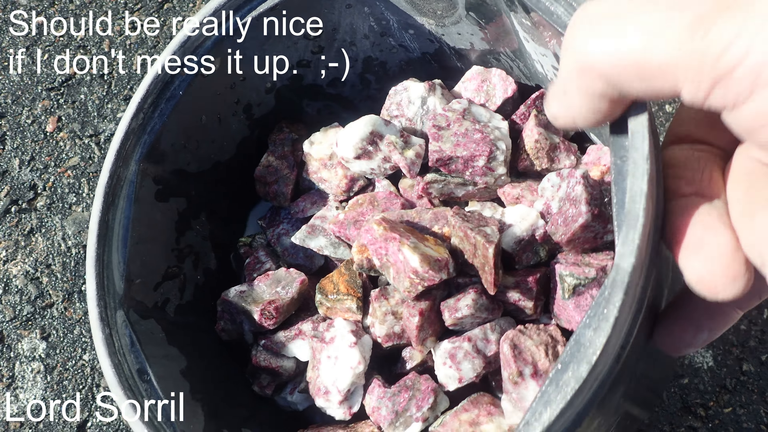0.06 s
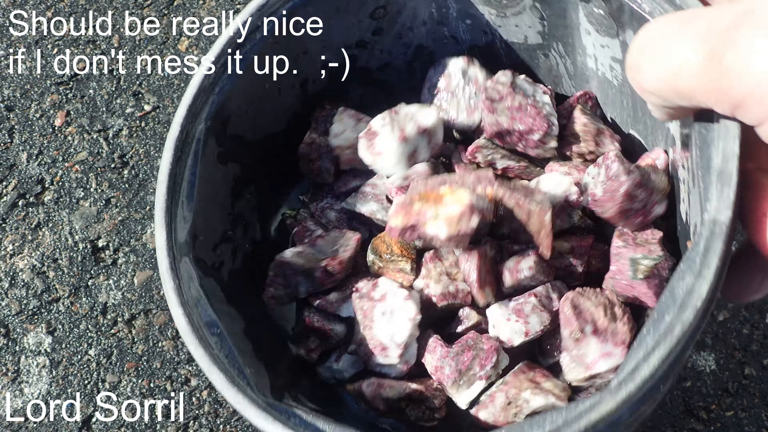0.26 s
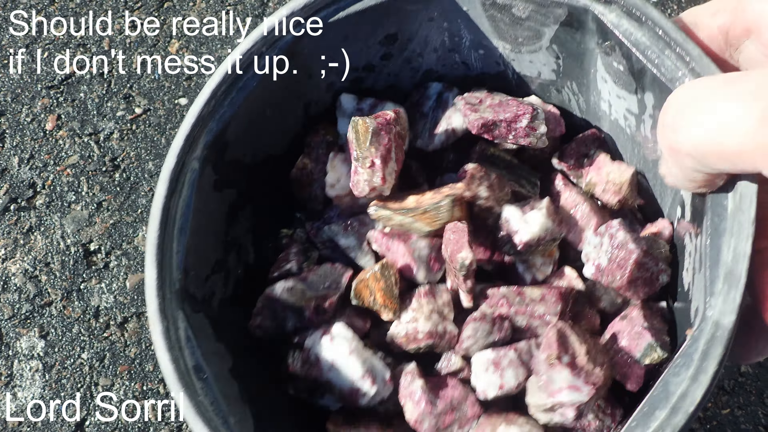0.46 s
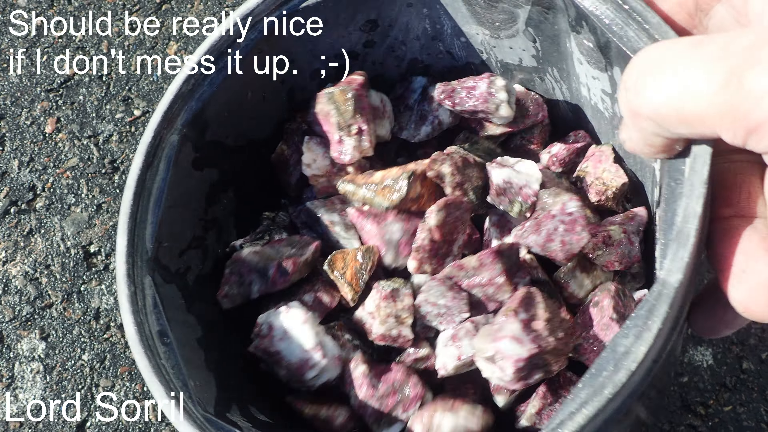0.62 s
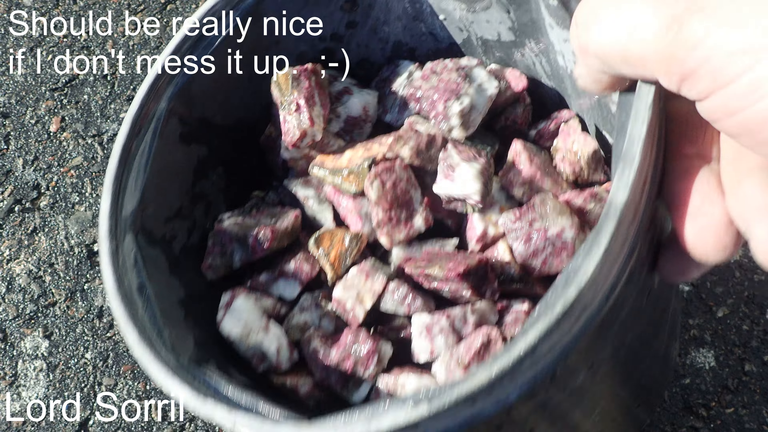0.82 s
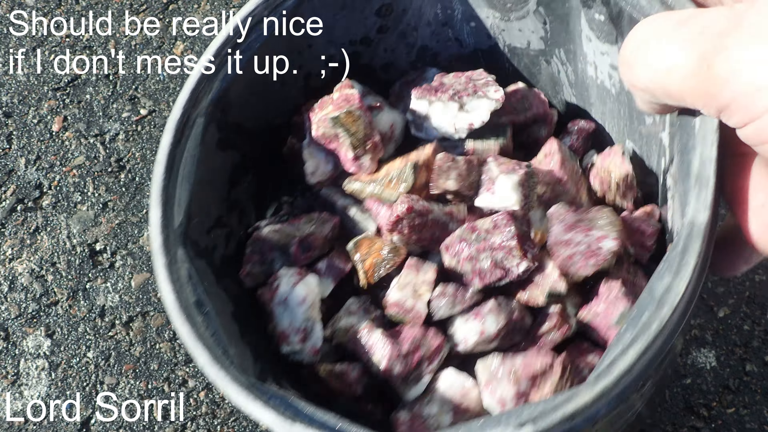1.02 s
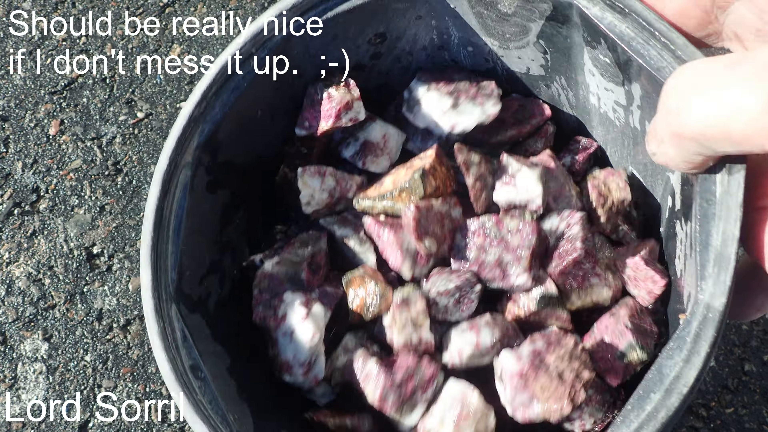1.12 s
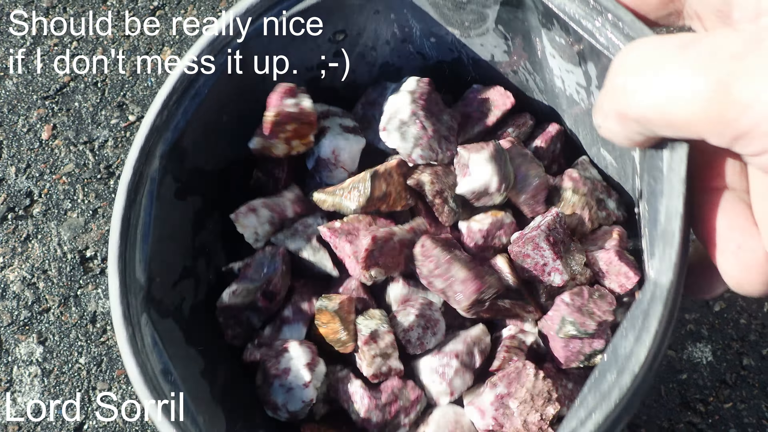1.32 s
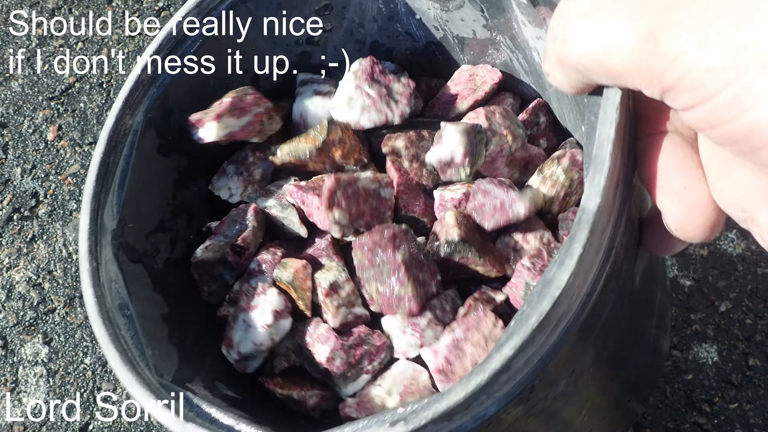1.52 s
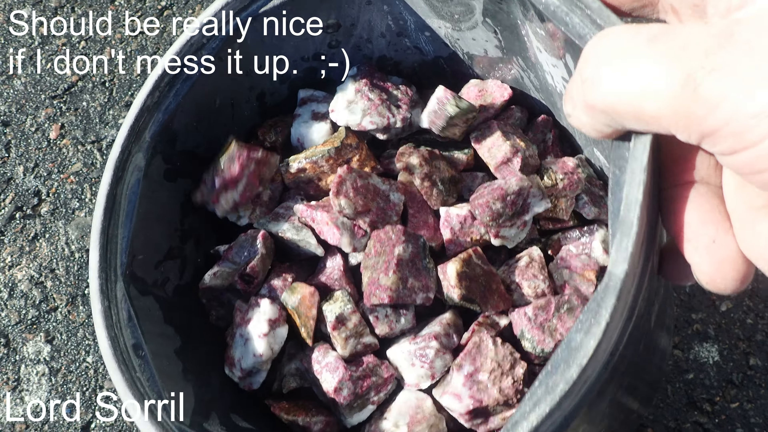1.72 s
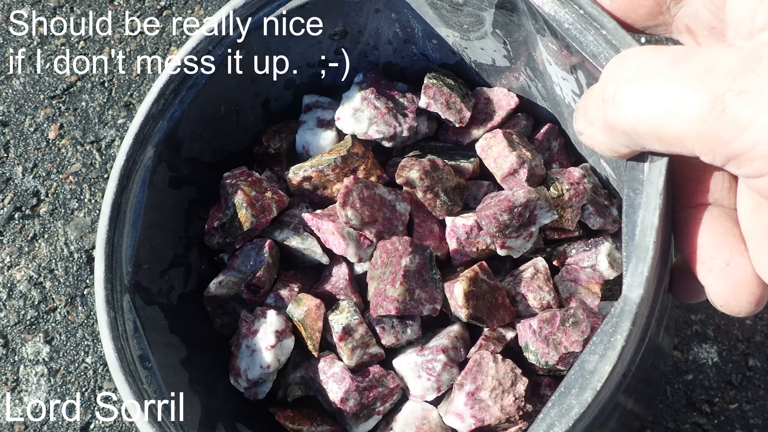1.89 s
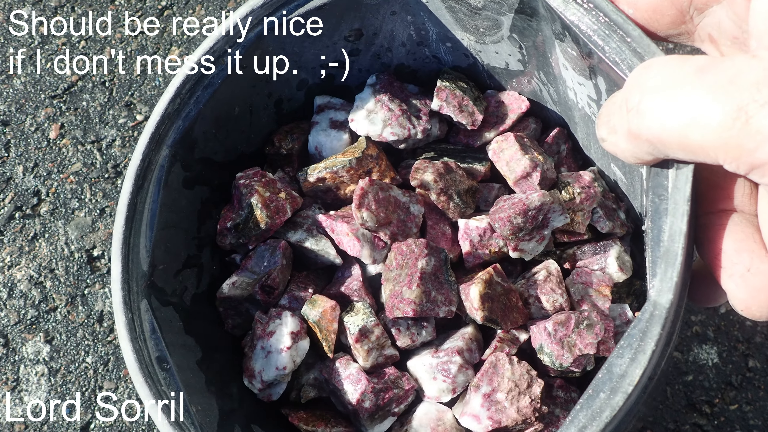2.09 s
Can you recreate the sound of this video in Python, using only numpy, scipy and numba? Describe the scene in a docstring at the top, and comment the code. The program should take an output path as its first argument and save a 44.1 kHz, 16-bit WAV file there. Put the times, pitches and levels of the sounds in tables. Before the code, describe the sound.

Rough stones rattle in an open rubber barrel shaken close to the microphone. After a light click, the shaking starts at about 0.2 seconds: quick surges of gritty scraping, bright clacks and hollow thumps against the wall. It eases around 1.7 seconds, and the stones settle with a few weak clicks by 1.9. Faint street rumble and a low machine hum run underneath throughout.

```python
"""Rough stones shaken in an open rubber barrel, outdoors, close to the microphone.
Single stones clack together and thump the damped wall; the heap slides to and fro in
surges of tiny contacts, heard as bright grit and hollow rubbing.
Street rumble, a low machine hum and a faint whirr lie underneath.
The recorder's gain control turns loud moments down."""
import sys
import numpy as np
from scipy import signal
from scipy.fft import rfft, irfft, next_fast_len
from scipy.io import wavfile
from scipy.ndimage import uniform_filter1d
from numba import njit

SR = 44100
rng = np.random.default_rng(int(sys.argv[2]) if len(sys.argv) > 2 else 0)


def generate_wav(sig):
    """Save sig (samples, or channels by samples) to the path in sys.argv[1] as 16-bit PCM at SR."""
    pcm = np.round(np.clip(np.atleast_2d(sig).T, -1, 1) * 32767).astype(np.int16)
    wavfile.write(sys.argv[1], SR, pcm)


N = 94815


def undb(db):
    """Decibels to gain."""
    return 10 ** (np.asarray(db) / 20)


def unit(x):
    """Scale to rms 1."""
    return x / np.sqrt(np.mean(x ** 2))


def on_log_axis(points, hz):
    """Interpolate (f/Hz, value) points over log frequency."""
    f, v = np.array(points, float).T
    return np.interp(np.log(np.maximum(hz, 1)), np.log(f), v)


def colour(x, points):
    """Minimum-phase filter with response (f/Hz, level/dB)."""
    size = next_fast_len(2 * len(x))
    size += size % 2
    cepstrum = irfft(np.log(undb(on_log_axis(points, np.fft.rfftfreq(size, 1 / SR)))))
    cepstrum[1:size // 2] *= 2
    cepstrum[size // 2 + 1:] = 0
    return irfft(rfft(x, size) * np.exp(rfft(cepstrum)))[:len(x)]


def fade(t, t60_s):
    """Exponential decay."""
    return np.exp(-np.log(1000) * t / t60_s)


def drift(rate_hz):
    """Smooth random drift, rms 1."""
    width = int(SR / rate_hz)
    smoothed = uniform_filter1d(rng.standard_normal(N), width, mode="wrap")
    return unit(uniform_filter1d(smoothed, width, mode="wrap"))


def add(out, start_s, sound):
    """Mix a sound in at start_s."""
    i = max(int(start_s * SR), 0)
    out[..., i:i + sound.shape[-1]] += sound[..., :N - i]


def swells(rows, rest=0):
    """Envelope: power sum of bells (centre/s, half length/s, level/dB) and a resting amplitude."""
    t = np.arange(N) / SR
    power = sum(undb(db) ** 2 * np.exp(-((t - mid_s) / half_s) ** 2) for mid_s, half_s, db in rows)
    return np.sqrt(rest ** 2 + power)


def street(hum_hz=119.9, hum_waver=0.012):
    """Distant traffic, a wavering machine hum and a faint whirr that swells now and then."""
    # traffic spectrum: f/Hz, level/dB
    traffic_spectrum = [(25, -38), (45, -26), (80, -18.5), (105, -4.5), (150, -3), (180, -9.5), (225, -6),
                        (280, -12.5), (360, -4), (430, -6), (495, 1), (650, -13), (1050, -6), (1500, -10.5),
                        (1850, -16), (2700, -31.5), (4200, -34.5), (5500, -25.5), (9000, -29),
                        (10500, -42.5), (15000, -44)]
    # whirr spectrum: f/Hz, level/dB
    whirr_spectrum = [(900, -15.5), (1200, -19.5), (1260, 15), (1320, -8), (1385, 10), (1450, -2),
                      (1900, -36.5)]
    # whirr swells: centre t/s, half length/s, level/dB
    whirr_swells = [(.08, 0.051, -33.5), (1.91, 0.04, -35), (2.01, 0.026, -32)]
    rumble = unit(colour(rng.standard_normal(N), traffic_spectrum)) * undb(-31 + drift(29))
    hum_phase = 2 * np.pi * np.cumsum(hum_hz * (1 + hum_waver * drift(6.2))) / SR
    hum = np.sqrt(2) * np.sin(hum_phase) * undb(-42 + 3.4 * drift(2.2))
    whirr = unit(colour(rng.standard_normal(N), whirr_spectrum)) * swells(whirr_swells)
    return rumble + hum + whirr


def contacts(per_s, spread_db):
    """Random tiny impacts, many weak and a few strong."""
    strength = undb(spread_db * np.minimum(rng.exponential(size=N), 4))
    return (rng.random(N) < per_s / SR) * strength * rng.choice([-1, 1], N)


def stone(x, ring_hz, ring_db=9, relative_width=0.045):
    """Contacts heard through one stone: the heap's colour, peaked at that stone's own ring."""
    # response common to all stones: f/Hz, level/dB
    heap_spectrum = [(500, -25), (2000, -8.5), (2600, -17), (4000, -9), (4700, 2.5), (5700, 2.5),
                     (7000, 0.5), (7700, -3.5), (9000, -3), (9600, -9.5), (10700, -24), (15000, -29)]
    hz = np.geomspace(300, SR / 2, 300)
    peak_db = ring_db / (1 + ((hz / ring_hz - 1) / relative_width) ** 2)
    return colour(x, np.column_stack([hz, on_log_axis(heap_spectrum, hz) + peak_db]))


def grit(per_s=1400, sizes=9, side_db=-21):
    """Small contacts on stones of several sizes, each panned at random."""
    mid, side = 0, 0
    for ring_hz in np.geomspace(4700, 8400, sizes):
        ticks = contacts(per_s / sizes, spread_db=2.5)
        mid += stone(ticks, ring_hz)
        side += stone(ticks * rng.standard_normal(N), ring_hz)
    side = undb(side_db) * unit(side)
    return unit(mid) + np.array([side, -side])


def sliding(start_s=0.23, stop_s=1.73, ramp_s=0.024, rub_gain_db=2.22, grit_gain_db=-2.5):
    """Each slide is a shower of contacts: bright grit between stones, hollow rubbing in the barrel."""
    # slides of the heap: centre t/s, half length/s, rub level/dB, grit level/dB
    slides = np.array([(0.175, 0.043, -31, -37.5), (0.219, 0.02, -25.5, -24.5),
                       (0.299, 0.029, -21.5, -15.5), (0.356, 0.022, -28.5, -22), (0.397, 0.027, -17.5, -13),
                       (0.469, 0.027, -22.5, -17), (0.541, 0.024, -21.5, -20), (0.617, 0.023, -19, -16),
                       (0.685, 0.018, -22, -17.5), (0.753, 0.03, -21, -19), (0.821, 0.025, -21, -20.5),
                       (0.925, 0.031, -19, -16.5), (1.012, 0.031, -21, -14.5), (1.084, 0.018, -18.5, -19),
                       (1.128, 0.03, -22.5, -18), (1.198, 0.027, -19.5, -15), (1.277, 0.025, -19, -14),
                       (1.354, 0.023, -19.5, -16), (1.431, 0.016, -25.5, -18.5),
                       (1.488, 0.024, -20.5, -20.5), (1.583, 0.029, -21, -17), (1.661, 0.036, -21, -17.5),
                       (1.73, 0.014, -24, -23.5), (1.828, 0.02, -29.5, -34)])
    # stones rubbing in the barrel: f/Hz, level/dB
    rub_spectrum = [(40, -28), (150, -23.5), (280, -9.5), (400, 3), (510, 10.5), (600, 4.5), (690, -6),
                    (950, 0.5), (1100, -3), (1250, 0), (1700, -5.5), (2000, -6), (2500, -18.5), (4000, -15),
                    (9000, -58)]
    t = np.arange(N) / SR
    shaking = (1 + np.tanh((t - start_s) / ramp_s)) * (1 - np.tanh((t - stop_s) / ramp_s)) / 4
    rub_envelope = swells(slides[:, [0, 1, 2]], rest=shaking * undb(-36))
    grit_envelope = swells(slides[:, [0, 1, 3]], rest=shaking * undb(-37.5))
    rub = unit(colour(contacts(per_s=1500, spread_db=2), rub_spectrum))
    return undb(rub_gain_db) * rub * rub_envelope + undb(grit_gain_db) * grit() * grit_envelope


def clacks(attack_s=0.0012, t60_s=0.0079, scatter_db=-18, scatter_t60_s=0.036, gain_db=1.5):
    """Two rough stones meet: a short ringing crunch, then weak scatter from inside the barrel."""
    # stone on stone: t/s, level/dB, ring f/Hz
    hits = [(0.1368, -37, 6030), (0.215, -29, 6040), (0.2308, -14.5, 6770), (0.2603, -19.5, 5900),
            (0.268, -30, 8200), (0.2958, -15, 5670), (.298, -15, 6040), (0.3326, -16.5, 5500),
            (0.3773, -22, 5440), (0.393, -17, 6600), (0.4152, -16, 8650), (0.4333, -15.5, 5350),
            (0.4379, -13.5, 5350), (0.4666, -15.5, 6650), (0.5262, -16.5, 5160), (.5393, -15, 7000),
            (0.5465, -16.5, 5600), (0.5533, -11.5, 7800), (0.615, -17.5, 6100), (0.6424, -15, 5850),
            (0.686, -18.5, 6400), (0.7052, -21, 8500), (0.7633, -20, 6100), (.797, -21, 6000),
            (.8337, -12.5, 5370), (.909, -16.5, 5070), (0.9159, -14, 5550), (.929, -13, 6340),
            (0.9483, -15, 5800), (.9755, -26, 5600), (1.0364, -11.5, 6200), (1.044, -16.5, 8500),
            (1.0513, -16, 5660), (1.088, -16.5, 6500), (1.098, -15, 5900), (1.1047, -18.5, 6000),
            (1.1211, -12, 5200), (1.133, -17, 6130), (1.1603, -17, 6600), (1.171, -19, 6800),
            (1.192, -16.5, 5800), (1.1942, -19, 6200), (1.219, -12, 5500), (1.2702, -15.5, 4830),
            (1.293, -18, 5460), (1.3402, -20, 7040), (1.388, -22, 5800), (1.4248, -17, 5860),
            (1.4868, -20, 8560), (1.5066, -13, 5270), (1.513, -13, 6100), (1.5735, -17.5, 6700),
            (1.597, -25, 5100), (1.6355, -17, 6350), (1.661, -18, 5500), (1.7299, -18, 6240),
            (1.736, -21.5, 4900), (1.7643, -20.5, 4530), (1.804, -30, 6800), (1.81, -30, 6300),
            (1.827, -25.5, 6390), (1.8585, -27.5, 7400)]
    out, t = np.zeros((2, N)), np.arange(2048) / SR
    onset = 1 - np.exp(-t / attack_s)
    for start_s, db, ring_hz in hits:
        stretch, pan_db = rng.standard_normal(2)
        chips, diffuse = rng.standard_normal((2, len(t)))
        # cubing leaves a few hard points of contact
        crunch = unit(chips ** 3) * fade(t, t60_s * np.exp(0.17 * stretch))
        scatter = undb(scatter_db) * diffuse * fade(t, scatter_t60_s)
        clack = stone((crunch + scatter) * onset, ring_hz)
        clack /= np.sqrt(np.mean(clack[t < 0.006] ** 2))
        add(out, start_s, clack * undb(db + gain_db + pan_db * np.array([[0.5], [-0.5]])))
    return out


def thumps(attack_s=0.00404, mode_spread=0.023, gain_db=1):
    """Stones land on the rubber wall, which gives softly and rings briefly."""
    # stone on wall: t/s, level/dB, loaded wall f/Hz
    hits = [(0.198, -9, 492), (0.222, -14.5, 494), (0.3081, -11.5, 510), (0.3291, -8.5, 490),
            (0.3866, -9, 425), (0.4491, -3, 509), (0.4982, -6.5, 506), (0.5226, -3.5, 522),
            (0.5395, -3.5, 528), (0.548, -12.5, 475), (0.5874, -12, 508), (0.602, -7.5, 518),
            (0.614, -4.5, 502), (0.6825, -8, 494), (0.695, -10.5, 524), (0.7635, -7, 458),
            (0.802, -7.5, 488), (0.8133, -1.5, 493), (0.8823, -10.5, 570), (1.0033, -2.5, 466),
            (1.0191, -5.5, 522), (1.0278, -2.5, 491), (1.066, -4, 465), (1.0954, -2, 472), (1.165, -9, 515),
            (1.2004, 1.5, 479), (1.2204, -6, 548), (1.2552, -7.5, 572), (1.3509, 2, 530.6),
            (1.404, -8, 540), (1.4783, -11.5, 524), (1.4998, -11.5, 527), (1.5875, -8, 534),
            (1.6613, -6.5, 534), (1.6696, -7, 503), (1.806, -15, 510)]
    # wall modes: frequency ratio, level/dB, t60/s
    wall_modes = [(1, 3, 0.053), (0.63, -13.5, 0.037), (0.938, -8, 0.046), (1.133, -31, 0.017),
                  (2.46, -34, 0.014)]
    out, t = np.zeros(N), np.arange(4096) / SR
    onset = 1 - np.exp(-(t / attack_s) ** 2)
    for start_s, db, wall_hz in hits:
        detunes = 1 + mode_spread * rng.standard_normal(len(wall_modes))
        ring = np.zeros(len(t))
        for (ratio, mode_db, t60_s), detune in zip(wall_modes, detunes):
            ring += undb(mode_db) * np.sin(2 * np.pi * wall_hz * ratio * detune * t) * fade(t, t60_s)
        add(out, start_s - attack_s / 2, undb(db + gain_db) * ring * onset)
    return out


def scene(barrel_gain_db=2):
    """Barrel and street as they reach the two microphone ports."""
    # port balance: f/Hz, left minus right level/dB
    port_balance = [(60, 3), (380, 4.5), (2400, 4.5), (3400, 8.5), (4400, -3.5), (5700, -6), (7000, 4),
                    (8100, 0), (15000, 0.5)]
    # port phase: f/Hz, left lead/rad
    port_phase = [(100, -0.011), (3200, -0.22), (4200, -1.76), (5100, -0.6), (6460, 0.72), (7400, -0.84),
                  (10200, -0.71)]
    sound = (sliding() + clacks() + thumps()) * undb(barrel_gain_db) + street()
    hz = np.fft.rfftfreq(N, 1 / SR)
    left_response = undb(on_log_axis(port_balance, hz) / 2) * np.exp(0.5j * on_log_axis(port_phase, hz))
    return irfft(rfft(sound) * np.array([left_response, 1 / left_response]), N)


@njit
def follow(x, attack_s, release_s):
    """One-pole level follower."""
    out, level = np.empty(len(x)), 0.
    for i in range(len(x)):
        level += (x[i] - level) / (SR * (attack_s if x[i] > level else release_s))
        out[i] = level
    return out


def record(dry, knee_db=-18.5, ratio=1.57, top_hz=15700):
    """Gain control, clipping at full scale and a steep top cut."""
    level = follow(np.abs(dry).mean(axis=0), attack_s=0.021, release_s=0.2)
    gain = np.maximum(level / undb(knee_db), 1) ** (1 / ratio - 1)
    lowpass = signal.ellip(8, 0.2, 70, top_hz, fs=SR, output="sos")
    return signal.sosfilt(lowpass, np.clip(dry * gain, -1, 1))


dry = scene()
out = record(dry)
generate_wav(out)
```